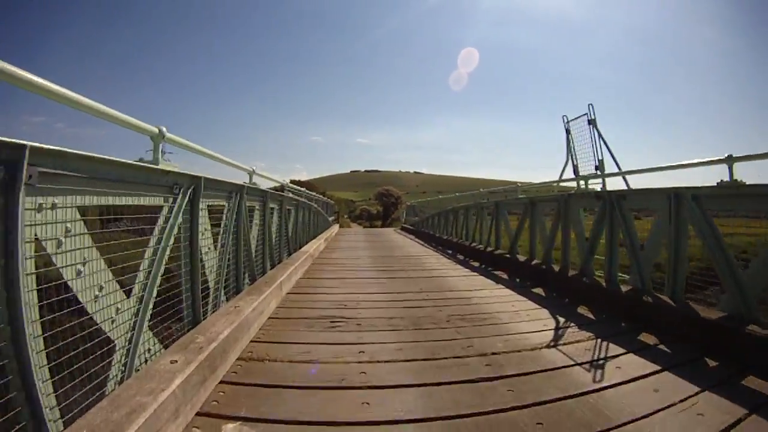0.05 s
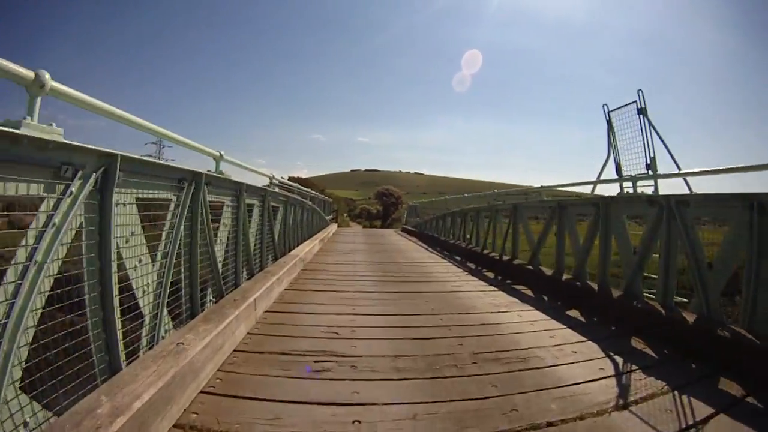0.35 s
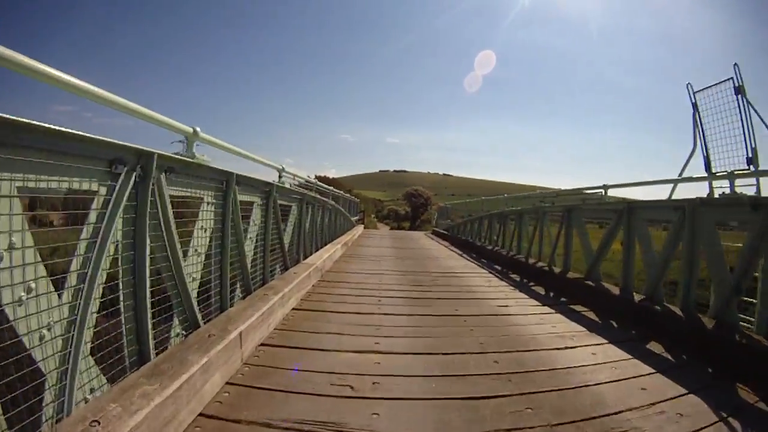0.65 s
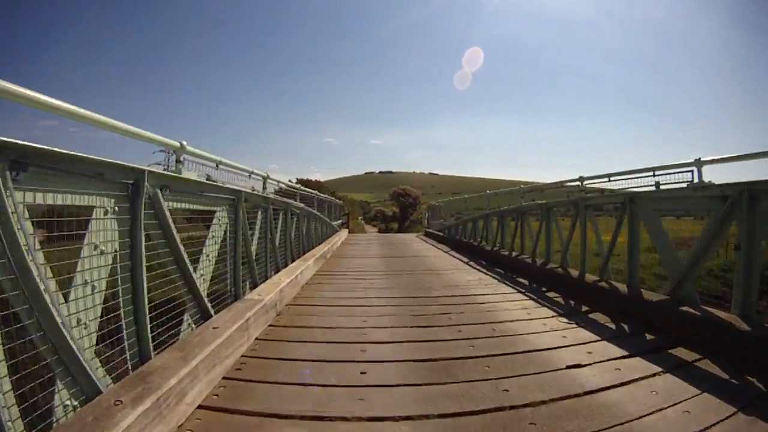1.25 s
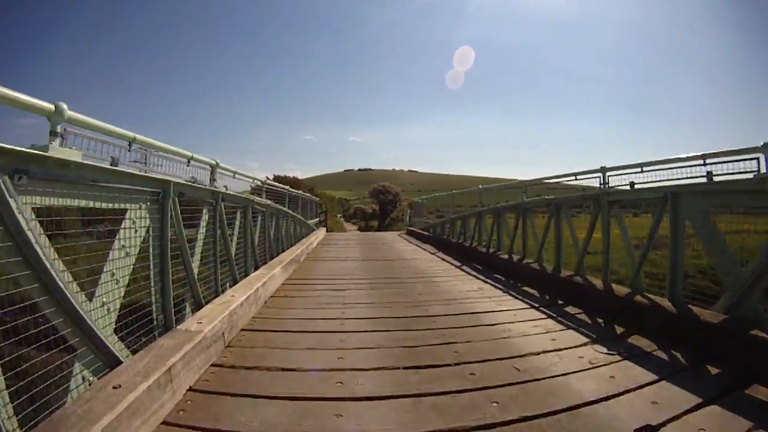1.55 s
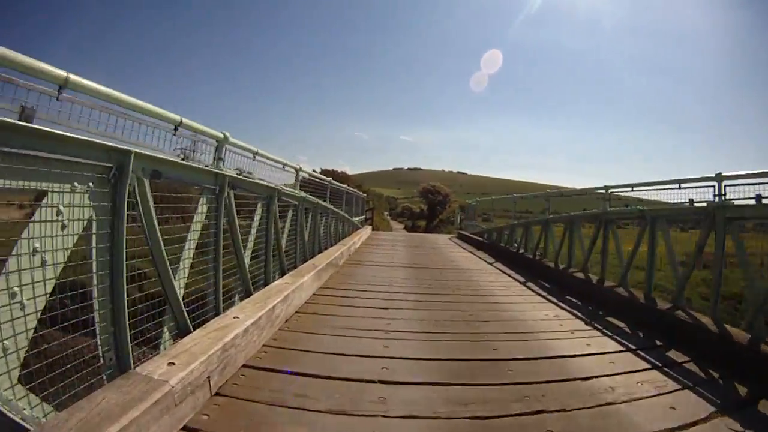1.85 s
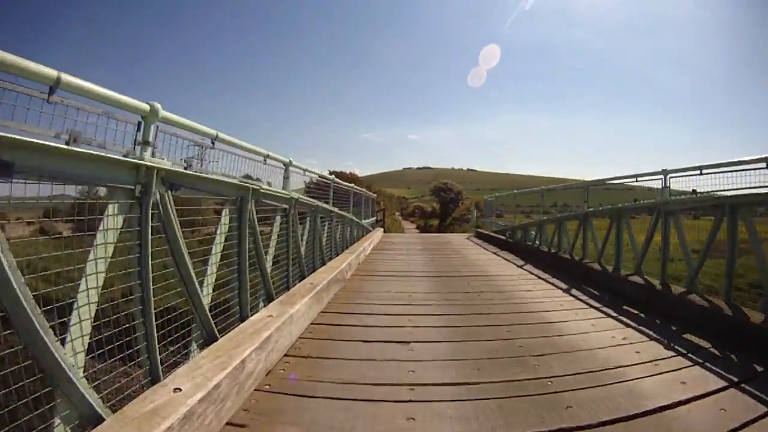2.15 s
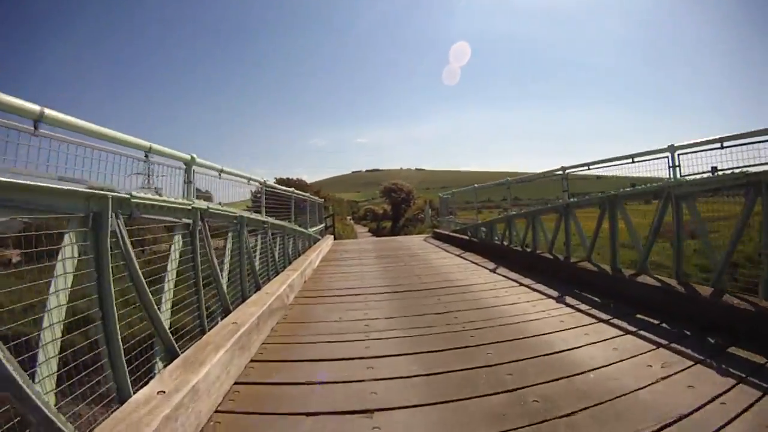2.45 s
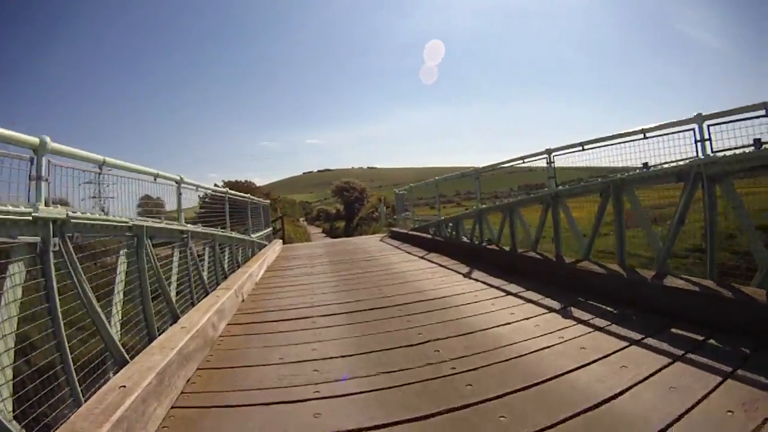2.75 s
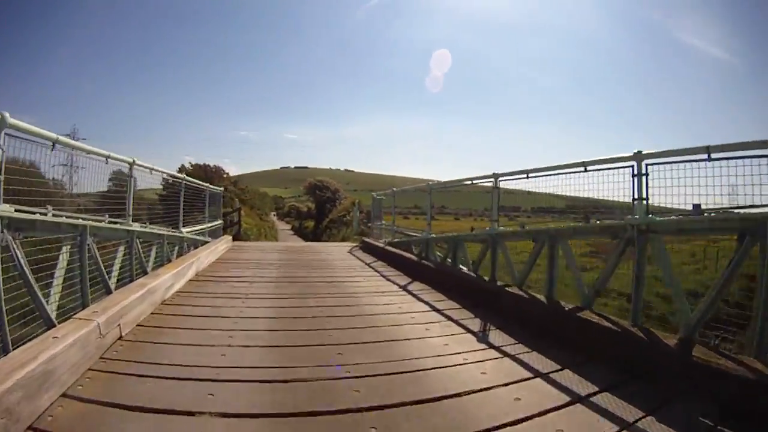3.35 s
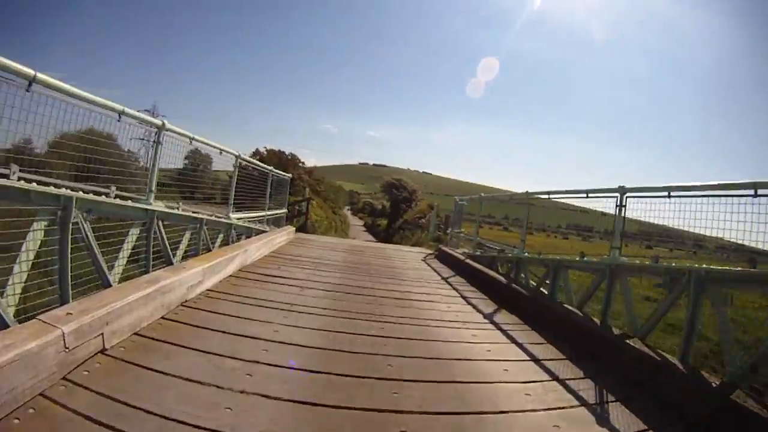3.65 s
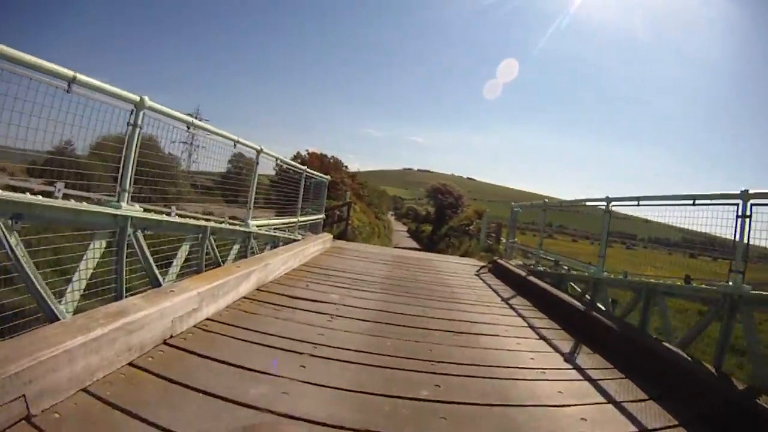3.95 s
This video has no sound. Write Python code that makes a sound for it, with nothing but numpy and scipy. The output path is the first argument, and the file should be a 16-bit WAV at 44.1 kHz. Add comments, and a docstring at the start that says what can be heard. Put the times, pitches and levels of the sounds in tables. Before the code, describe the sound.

Gusty wind roars, flutters and pops on the microphone throughout, strongest in the first two seconds. Underneath, bicycle tyres rumble softly over a wooden bridge, with chain ticks and small metal clinks. Planks thump irregularly, hardest around 1 and 3 seconds, and a sharp knock stands out at 2.3 seconds. From about 3.5 seconds the freewheel clicks, quickening as the bicycle coasts.

```python
"""A bicycle rolls over a wooden plank bridge while gusty wind buffets the microphone riding on it.
Turbulence gives a fluttering roar with pops. Rolling contact makes the tyres rumble, hiss and scrape
on grit, and impacts excite damped modes: planks thump, the mount and frame knock, and the chain and
a loose fitting tick and rattle. Near the end the rider coasts and the freewheel clicks ever faster."""
import sys
import numpy as np
from scipy import signal
from scipy.fft import rfft, irfft
from scipy.io import wavfile
from scipy.ndimage import uniform_filter1d

SR = 44100
rng = np.random.default_rng(int(sys.argv[2]) if len(sys.argv) > 2 else 0)


def log_audio(samples):
    """Write samples as a 16-bit WAV file to the path given in sys.argv[1]."""
    # one column per channel
    frames = np.atleast_2d(samples).T
    # limit to full scale, then quantise
    limited = np.clip(frames, -1, 1)
    pcm = np.round(limited * 32767).astype(np.int16)
    wavfile.write(sys.argv[1], SR, pcm)


N = 176400

# Levels within a spectrum or a set of modes are relative; spectra give density.
# strength of the wind: t/s, level/dB
GUSTS = [(0, -29), (0.05, -26.5), (0.11, -34.5), (0.19, -33), (0.22, -29), (0.3, -20.5), (0.36, -29.5),
         (0.44, -20), (0.54, -28), (0.68, -26), (0.75, -38.5), (0.81, -29.5), (0.91, -41), (0.98, -20.5),
         (1.04, -22), (1.09, -37.5), (1.23, -23), (1.33, -33.5), (1.42, -32.5), (1.57, -23), (1.71, -25),
         (1.76, -35), (1.8, -18), (1.85, -37.5), (1.95, -30), (2.2, -27.5), (2.33, -29), (2.41, -27),
         (2.58, -33), (2.67, -29.5), (3.04, -27), (3.09, -30), (3.15, -25.5), (3.37, -32), (3.41, -24.5),
         (3.51, -24), (3.57, -43), (3.76, -37.5), (3.82, -28.5), (3.93, -27), (4.0, -33)]
# spectrum of the turbulence: f/Hz, level/dB
WIND_SPECTRUM = [(25, -44.5), (50, -27), (70, -8), (110, -7), (170, -1.5), (260, 0), (380, -1), (600, -5.5),
                 (900, -13.5), (1400, -26), (2000, -42.5), (3000, -75), (9000, -73.5)]
# eddies that pop on the microphone: t/s, peak level/dB
POPS = [(.225, -14), (.247, -16), (.377, -14.5), (.518, -18), (.582, -17), (1.057, -13), (1.238, -15.5),
        (1.555, -12), (1.57, -16), (1.623, -18), (1.82, -13.5), (2.425, -17), (3.059, -12.5),
        (3.348, -12.5), (3.443, -28), (3.935, -13)]
# heavily damped modes of a pop: f/Hz, level/dB, T60/s
POP_MODES = [(288.5, 1.5, .014), (669, 0, 0.0074)]
# treble envelope, followed by tyre noise and rattle: t/s, level/dB
TREBLE = [(0, -62.5), (0.08, -71), (0.27, -61.5), (0.34, -69), (0.6, -75), (0.97, -66.5), (1.06, -74.5),
          (1.3, -77.5), (1.4, -66), (1.53, -66), (1.59, -81), (1.87, -69.5), (2.0, -66), (2.42, -61.5),
          (2.6, -67), (2.83, -61.5), (3.05, -76.5), (3.27, -64), (3.45, -69.5)]
# spectrum of the tyre rumble: f/Hz, level/dB
RUMBLE_SPECTRUM = [(40, -27), (70, -4.5), (200, 1.5), (1100, -6.5), (1550, -1), (2000, -16), (3000, -32.5),
                   (12000, -54)]
# spectrum of the tyre hiss: f/Hz, level/dB
HISS_SPECTRUM = [(1500, 19), (3000, -16), (4500, 9), (6000, 0), (7800, 3.5), (9000, -3.5), (11000, -6.5),
                 (15000, -16.5)]
# impacts on raised planks: t/s, relative peak level/dB
THUMPS = [(0.034, -17.5), (0.975, -8.5), (0.989, -9.5), (1.441, -16), (1.549, -12), (1.869, -15),
          (2.404, -15.5), (2.664, -15.5), (2.809, -14), (2.979, -16), (3.041, -8), (3.138, -15.5),
          (3.392, -13)]
# low modes of deck and frame: f/Hz, level/dB, T60/s
DECK_MODES = [(168, -12, 0.096), (252, -13, 0.022), (332.6, 0, 0.09), (481, -2, 0.1), (586, -1.5, 0.064),
              (777, 1, 0.023), (912, -0.5, 0.014)]
# hard knocks of the mount: t/s, peak level/dB
KNOCKS = [(.1435, -20), (.8535, -15.5), (.936, -26.5), (.95, -29), (.9645, -23.5), (.9895, -22.5),
          (1.057, -35), (1.425, -20), (1.454, -25.5), (1.759, -23), (2.169, -18), (2.2983, -7.5),
          (2.684, -26), (2.84, -23.5), (3.152, -24), (3.329, -30)]
# modes of the mount: f/Hz, level/dB, T60/s
MOUNT_MODES = [(1040, -5.5, 0.027), (1305, 3.5, 0.019), (1487, 13, 0.0049), (2027, 3, 0.0078),
               (2424, -3, 0.027), (3035, -4, 0.014), (3400, -3.5, 0.0047), (4670, -10, 0.0097),
               (5450, -15.5, 0.012), (7460, -30, .009)]
# sharp ticks of the chain: t/s, peak level/dB
TICKS = [(.415, -37.5), (.779, -39.5), (.853, -29), (.918, -37), (1.228, -40), (1.423, -32.5), (1.866, -40),
         (2.007, -35), (2.116, -26), (2.298, -28), (2.357, -34.5), (2.513, -32), (2.558, -41),
         (2.751, -34.5), (2.818, -33), (3.111, -32.5), (3.747, -32.5)]
# modes of the chain: f/Hz, level/dB, T60/s
CHAIN_MODES = [(4050, 13, 0.0047), (4390, 5, 0.015), (7250, 9.5, 0.005), (7950, -1, 0.015),
               (8950, -4.5, 0.0048), (9600, -3.5, 0.0065), (12400, -16, .012)]
# clinks of a loose metal fitting: t/s, peak level/dB
CLINKS = [(.549, -42), (.652, -38.5), (1.229, -42), (2.051, -31.5), (2.558, -34), (2.840, -34),
          (3.153, -25.5), (3.163, -32.5), (3.296, -36), (3.329, -33), (3.76, -27), (3.891, -35.5),
          (3.932, -33.5)]
# modes of that metal part: f/Hz, level/dB, T60/s
METAL_MODES = [(2580, -4, 0.038), (3010, 2, 0.015), (4317, 11.5, 0.021), (4846, -2, 0.028),
               (5200, -13, 0.011), (7750, -14.5, 0.035)]
# hollow clunks of the frame: t/s, peak level/dB
CLUNKS = [(2.209, -16.5), (2.666, -21), (2.819, -20.5), (3.289, -14)]
# modes of the frame: f/Hz, level/dB, T60/s
FRAME_MODES = [(1130, 5, 0.017), (1450, -2, 0.012)]
# scrapes of the tyre on grit: t/s, duration/s, level/dB
SCRAPES = [(.92, 0.1, -63), (1.334, 0.031, -52.5), (1.932, 0.047, -51)]
# spectrum of the grit: f/Hz, level/dB
GRIT_SPECTRUM = [(900, -3), (1700, 4), (3000, 4), (4500, 2), (6200, -2), (7800, -5), (10000, -12),
                 (15000, -33)]
# spectrum of a pawl click: f/Hz, level/dB
PAWL_SPECTRUM = [(1000, 13), (1550, 12), (2100, 1), (3600, -9.5), (4300, -4.5), (5600, -13), (6400, -10),
                 (7800, -11.5), (9000, -16), (9900, -14), (12300, -26), (14000, -14), (15000, -37)]

GRAIN_HZ = 449  # rate of the level fluctuation that roughens hiss, grit and clicks


def undb(db):
    """Amplitude ratio of a level in decibels."""
    return 10 ** (np.asarray(db) / 20)


def unit(x):
    """Normalisation to rms 1."""
    return x / np.sqrt(np.mean(x ** 2))


def curve(rows):
    """Linear interpolation of (t/s, value) rows at every sample."""
    return np.interp(np.arange(N) / SR, *np.array(rows).T)


def flutter(spread_db, rate_hz):
    """Random amplitude modulation: a gain whose level wanders smoothly by spread_db rms."""
    hold = max(int(SR / rate_hz), 1)
    steps = np.repeat(rng.standard_normal(N // hold + 1), hold)
    smooth = uniform_filter1d(uniform_filter1d(steps, hold), hold // 2 + 1)
    return undb(spread_db * unit(smooth[:N]))


def noise(spectrum):
    """Spectral shaping of white noise by (f/Hz, level/dB) rows; rms 1."""
    hz, db = np.array(spectrum).T
    f = np.arange(N // 2 + 1) * SR / N
    gain = undb(np.interp(np.log(f + 1), np.log(hz), db))
    return unit(irfft(rfft(rng.standard_normal(N)) * gain, N))


def ring(modes, scatter_db, detune, buzz):
    """Modal superposition: one blow, of peak 1, is a sum of damped sines roughened by a brief crack."""
    crack_db, crack_s = -12, 0.0033
    t = np.arange(SR // 10) / SR
    out = 0
    for (hz, db, t60), (level_draw, pitch_draw) in zip(modes, rng.standard_normal((len(modes), 2))):
        lowpass = signal.butter(3, min(hz / 3, SR / 4), fs=SR, output="sos")
        rough = unit(signal.sosfilt(lowpass, rng.standard_normal(len(t))))
        decay = (1 + buzz * rough) * np.exp(-np.log(1000) * t / t60)
        crack = undb(crack_db) * rough * np.exp(-t / crack_s)
        onset = 1 - np.exp(-(2 * t * hz) ** 2)
        gain = rng.choice([-1, 1]) * undb(db + scatter_db * level_draw)
        tone = np.sin(2 * np.pi * hz * (1 + detune * pitch_draw) * t)
        out = out + gain * onset * (decay + crack) * tone
    return out / np.abs(out).max()


def strike(events, modes, scatter_db=4.0, detune=0.01, buzz=0):
    """Impulse excitation: the modes ring, a little differently, at each (t/s, peak level/dB)."""
    out = np.zeros(N + SR)
    for start_s, db in events:
        blow = ring(modes, scatter_db, detune, buzz)
        i = int(np.clip(start_s * SR, 0, N))
        out[i:i + len(blow)] += undb(db) * blow
    return out[:N]


def patter(modes, taps_per_s=88):
    """Shot noise: small impulses at random times excite the modes; rms 1."""
    when, chance = rng.random((int(taps_per_s * N / SR), 2)).T
    taps = zip(when * N / SR, np.minimum(-np.log(chance), 3))
    return unit(strike(taps, modes, scatter_db=-0.5, detune=0.041))


def wind():
    """Turbulent pressure at the microphone: eddies swell band by band, and the hardest ones pop."""
    eddy_db, bass_db_per_db = 2.5, -0.4
    gust_db = curve(GUSTS)
    air, bands = noise(WIND_SPECTRUM), 0
    for edge_hz in (150, 300, 600, 1200):
        band = signal.sosfiltfilt(signal.butter(4, edge_hz, fs=SR, output="sos"), air)
        air = air - band
        swell = flutter(eddy_db, edge_hz / 4)
        if edge_hz == 150:  # the share of bass falls in a gust, so gusts are brighter
            swell = undb(bass_db_per_db * (gust_db - gust_db.mean()))
        bands = bands + band * swell
    bands = bands + air * flutter(eddy_db, 370)
    roar = unit(bands * flutter(1.87, 100.04))
    sputter = undb(-5.5) * patter(POP_MODES)
    return unit(roar + sputter) * undb(gust_db) + strike(POPS, POP_MODES, detune=0.11)


def tyres():
    """Rolling noise: uneven contact with the boards gives a rumble and a crackling hiss."""
    treble_db = curve(TREBLE)
    rumble_db = -42.5 + 0.68 * (treble_db - treble_db.mean())
    rumble = unit(noise(RUMBLE_SPECTRUM) * flutter(4, 45)) * undb(rumble_db)
    hiss = noise(HISS_SPECTRUM) * flutter(3.3, GRAIN_HZ) * undb(treble_db + 8.5)
    return rumble + hiss


def rattle():
    """Contact chatter: shaking taps the loose metal and the mount in a dense random stream."""
    shaking = undb(2) * patter(METAL_MODES) + undb(12.5) * patter(MOUNT_MODES)
    return undb(curve(TREBLE)) * shaking


def planks():
    """Impact excitation: the tyres thump on raised boards, each with its own pitch."""
    return undb(-0.5) * strike(THUMPS, DECK_MODES, detune=0.081)


def jolts():
    """Free vibration: jolted parts ring in their own modes, and the loose one buzzes as it rings."""
    mount = strike(KNOCKS, MOUNT_MODES, scatter_db=3.0)
    chain = strike(TICKS, CHAIN_MODES)
    loose_metal = strike(CLINKS, METAL_MODES, buzz=0.17)
    frame = strike(CLUNKS, FRAME_MODES)
    return mount + chain + loose_metal + frame


def scrapes():
    """Friction noise: grit crackles under the tyre in short, rounded swells."""
    t, swell = np.arange(N) / SR, 0
    for start_s, duration_s, db in SCRAPES:
        position = 2 * (t - start_s) / duration_s - 1  # -1 to 1 across the scrape
        swell = swell + undb(db) * np.sqrt(np.maximum(1 - position ** 2, 0))
    return swell * unit(noise(GRIT_SPECTRUM) * flutter(3.5, GRAIN_HZ))


def freewheel():
    """Ratchet impacts: pawls snap ever faster and harder, each ringing the hub in a gritty burst."""
    click_s, first_gap_s, steady_gap_s, shrink = 3.5438, 0.043, 0.0302, 0.66
    rise_s, decay_s, tail_s, tail_db = 0.0015, 0.005, 0.025, -18.5
    t, envelope = np.arange(N) / SR, 0
    for k in range(15):
        age = np.maximum(t - click_s, 0)
        force = 1 - shrink ** (k + 2)
        onset = 1 - np.exp(-(age / rise_s) ** 2)
        decay = np.exp(-age / decay_s) + undb(tail_db) * np.exp(-age / tail_s)
        envelope = envelope + force * onset * decay
        click_s += steady_gap_s + (first_gap_s - steady_gap_s) * shrink ** k
    return undb(-28) * envelope * unit(noise(PAWL_SPECTRUM) * flutter(5, GRAIN_HZ))


def scene():
    """Superposition: all sources add in the middle, with a faint rush in antiphase between the ears."""
    side = undb(-83.5) * noise([(300, 23), (1000, 16.0), (3000, 11), (14000, 4)])
    middle = wind() + tyres() + rattle() + planks() + jolts() + scrapes() + freewheel()
    return middle + side * np.array([[1], [-1]])


def record(dry):
    """Band limiting and soft saturation: the deepest rumble and the top are cut, loud peaks rounded."""
    low_hz, top_hz, ceiling = 42, 15200, 0.91
    lean = signal.sosfilt(signal.butter(2, low_hz, "high", fs=SR, output="sos"), dry)
    rounded = ceiling * np.tanh(lean / ceiling)
    return signal.sosfilt(signal.ellip(8, .2, 70, top_hz, fs=SR, output="sos"), rounded)


dry = scene()
out = record(dry)
log_audio(out)
```